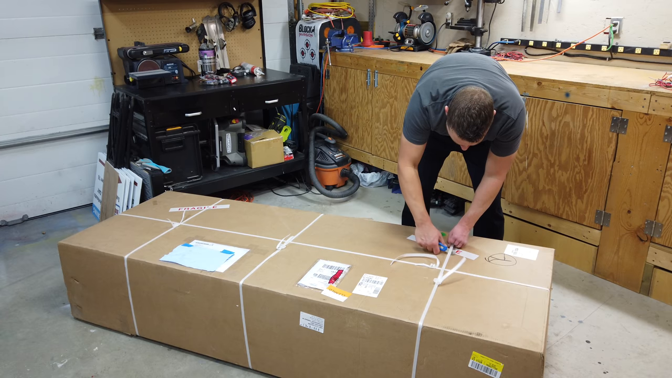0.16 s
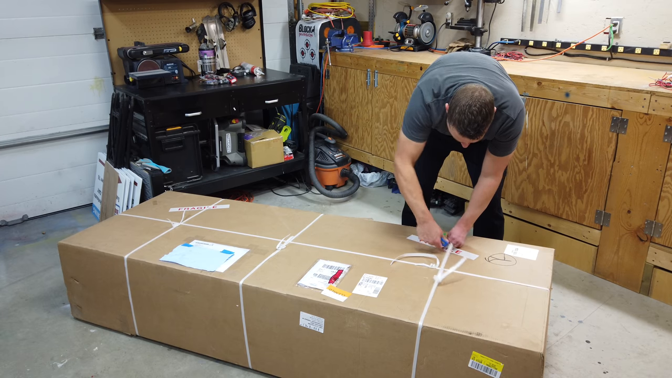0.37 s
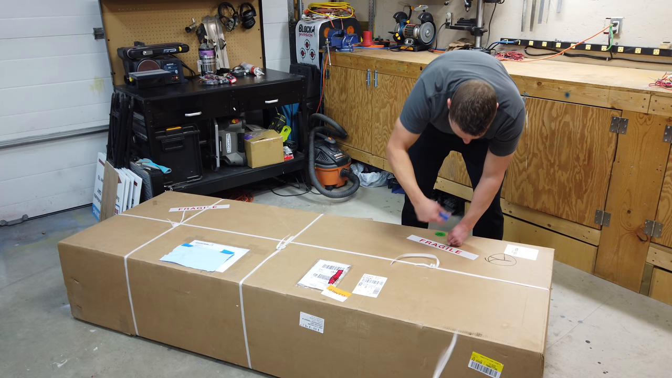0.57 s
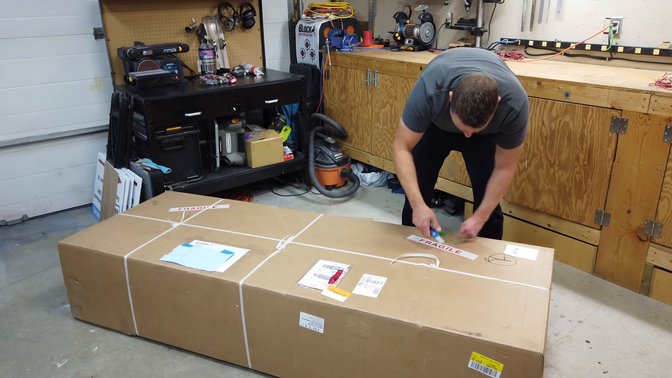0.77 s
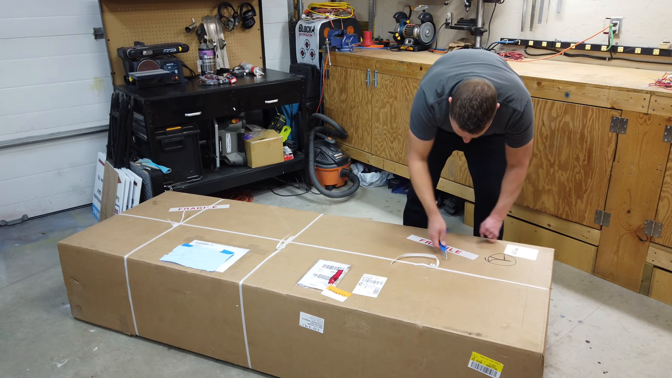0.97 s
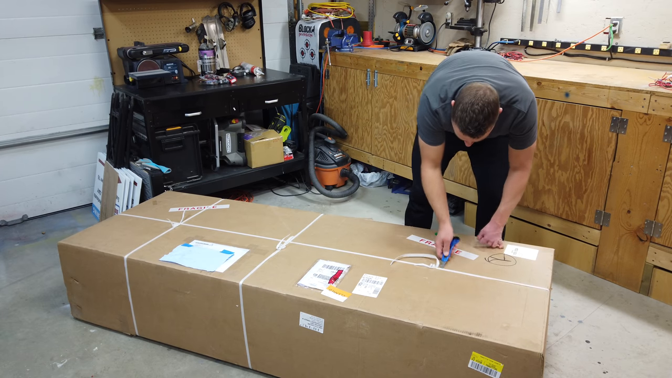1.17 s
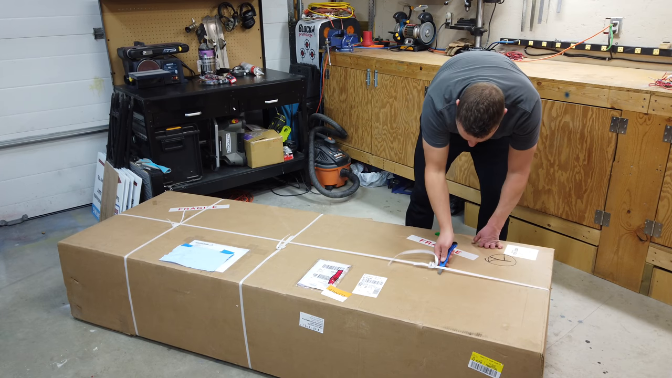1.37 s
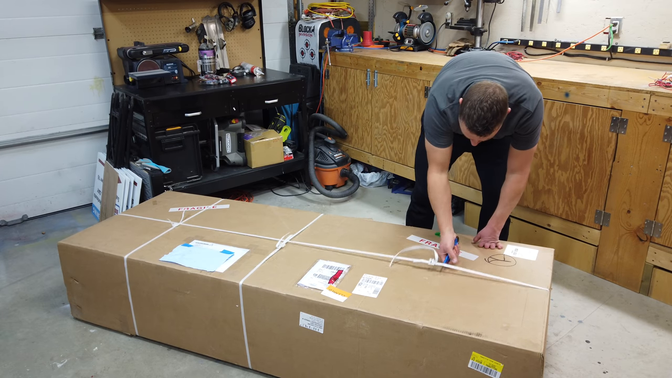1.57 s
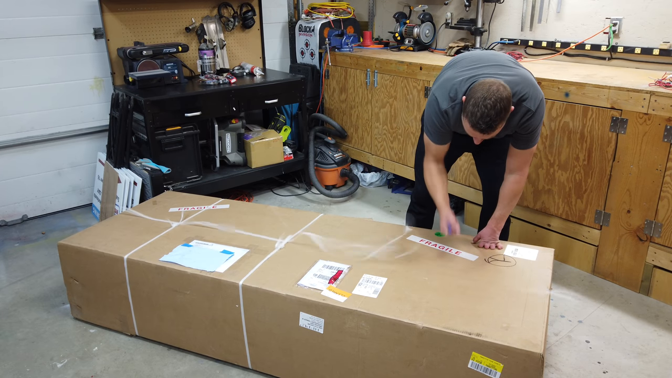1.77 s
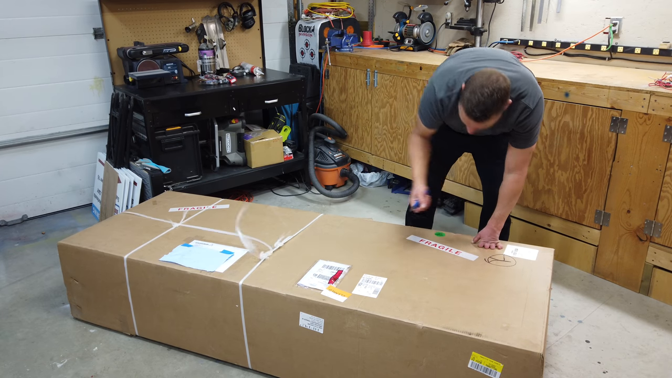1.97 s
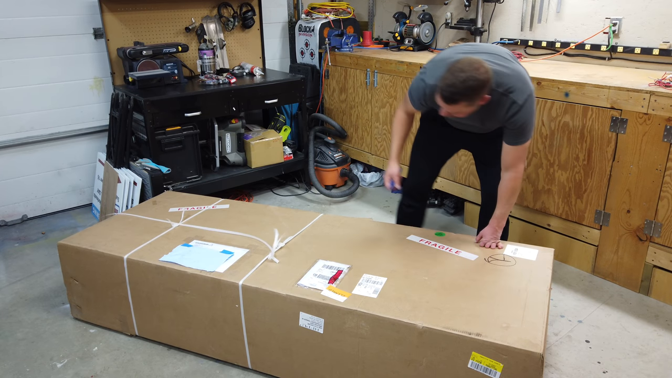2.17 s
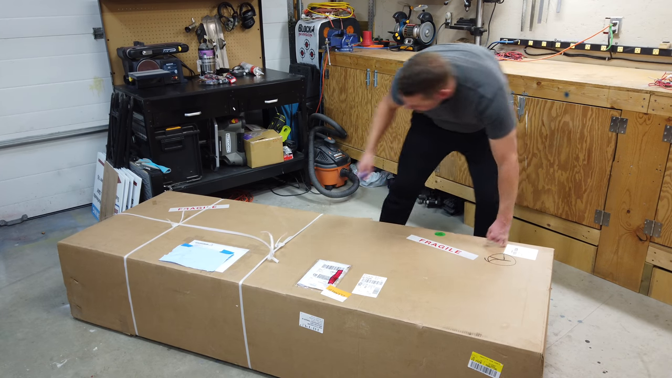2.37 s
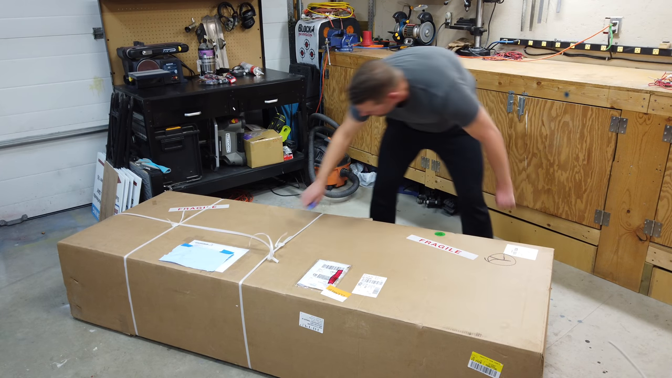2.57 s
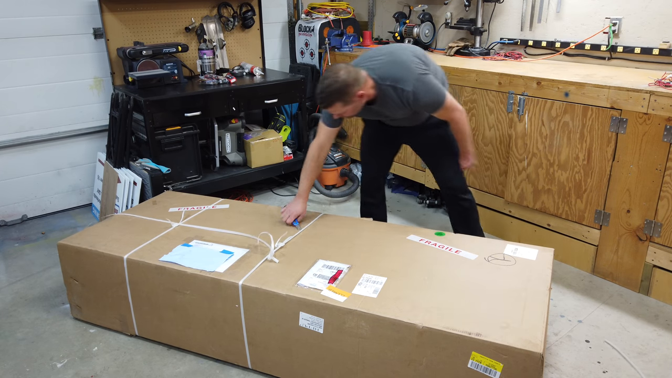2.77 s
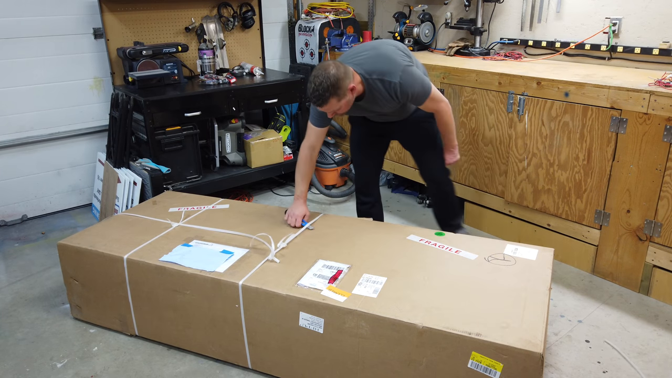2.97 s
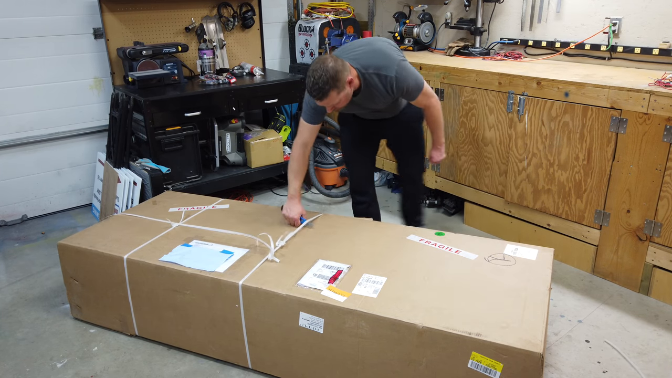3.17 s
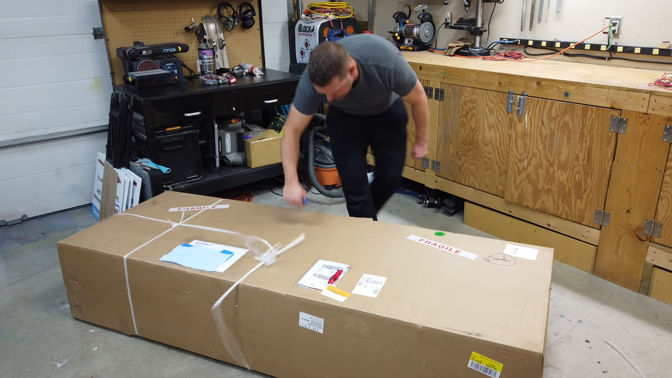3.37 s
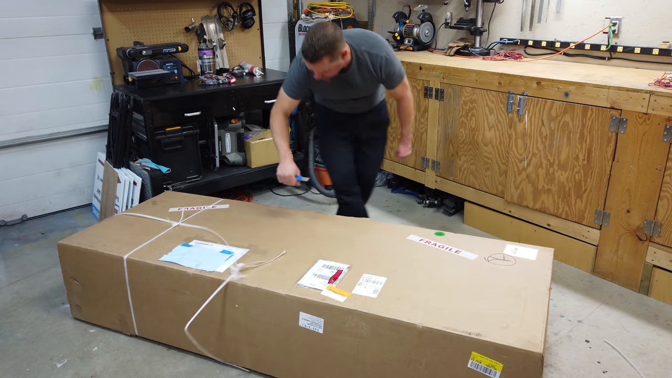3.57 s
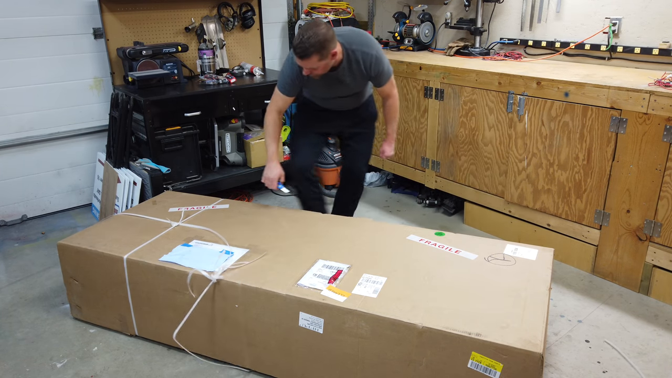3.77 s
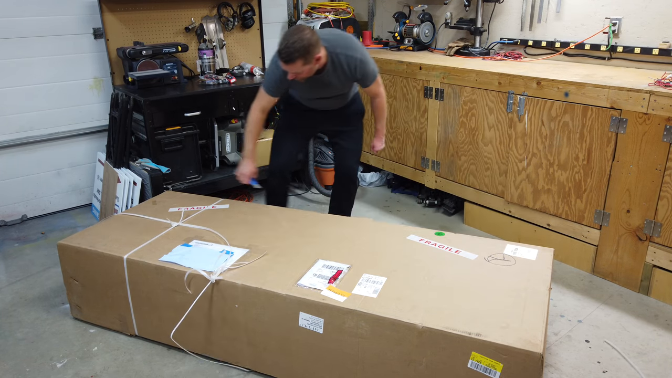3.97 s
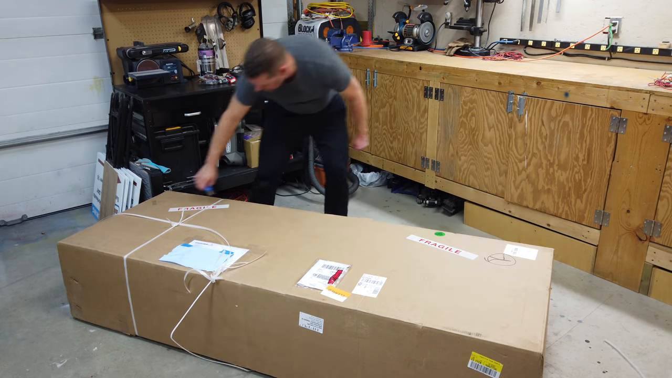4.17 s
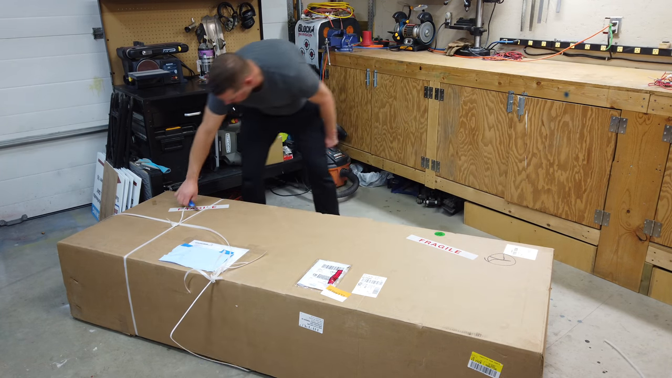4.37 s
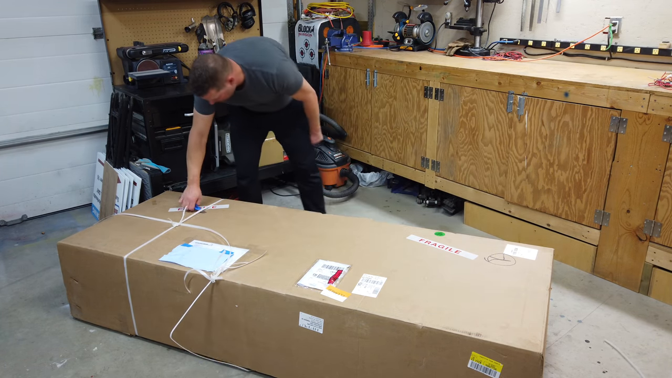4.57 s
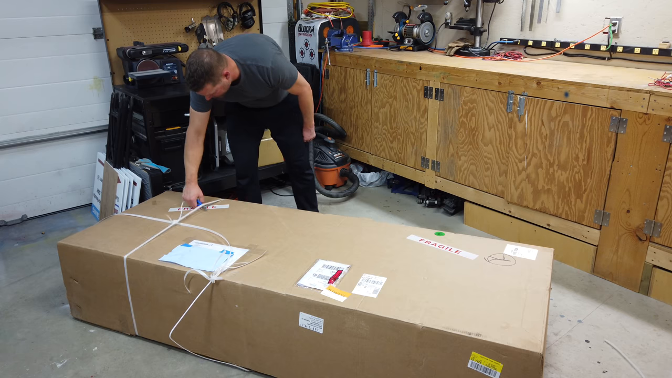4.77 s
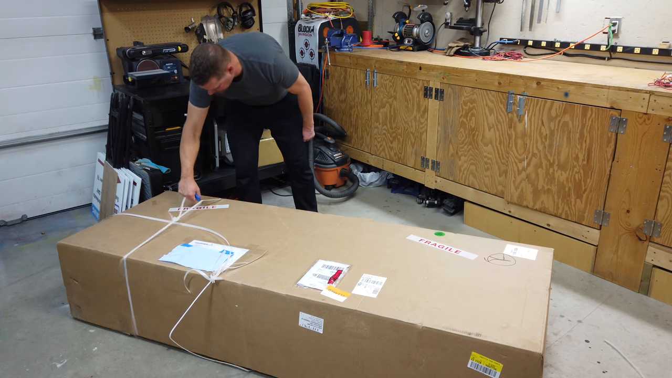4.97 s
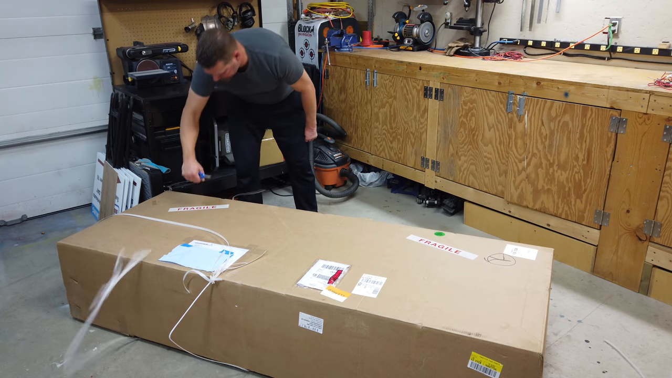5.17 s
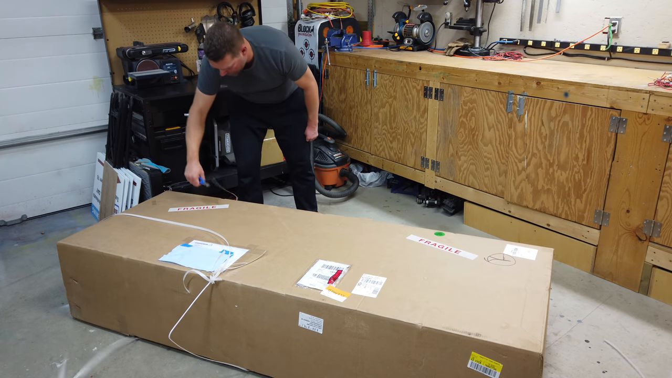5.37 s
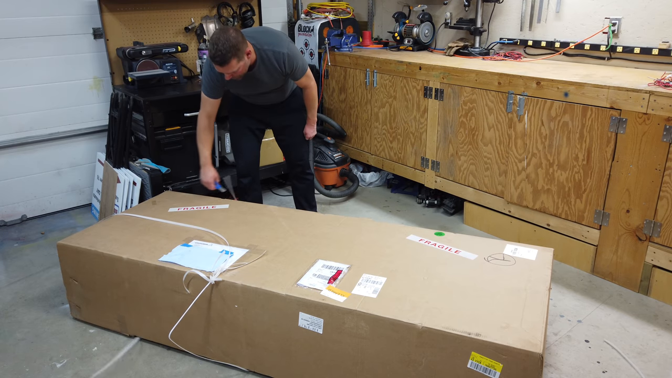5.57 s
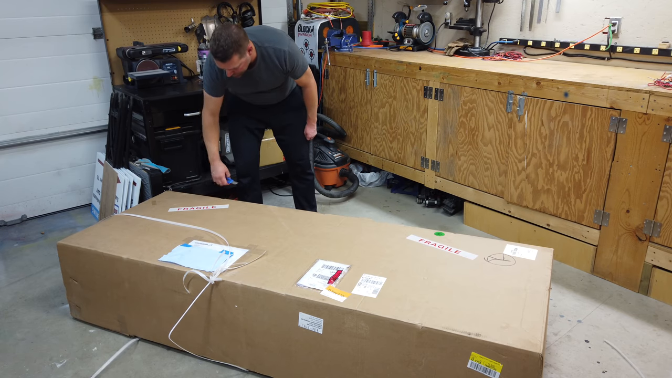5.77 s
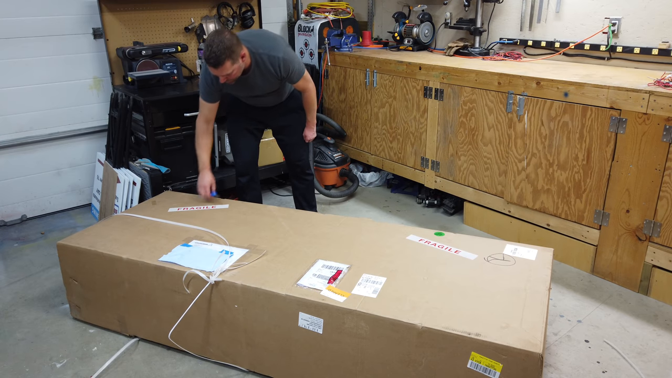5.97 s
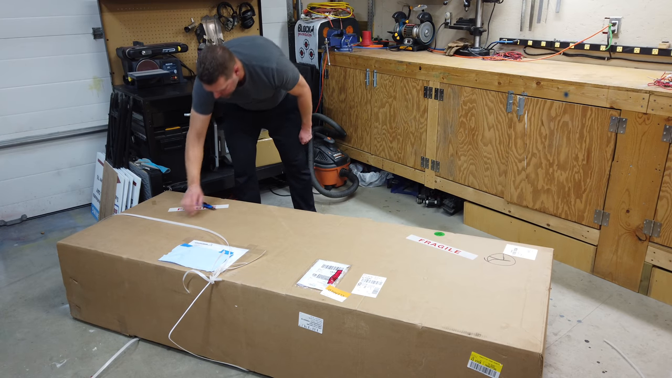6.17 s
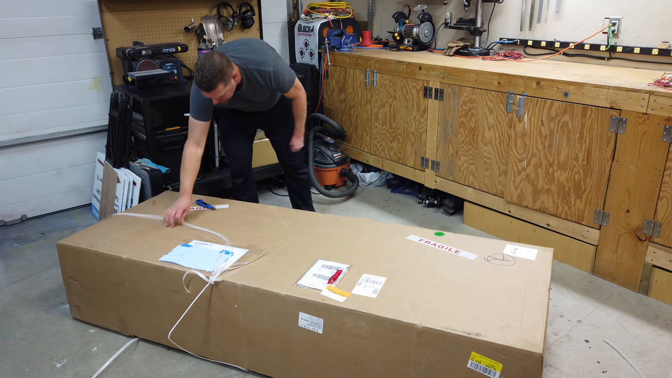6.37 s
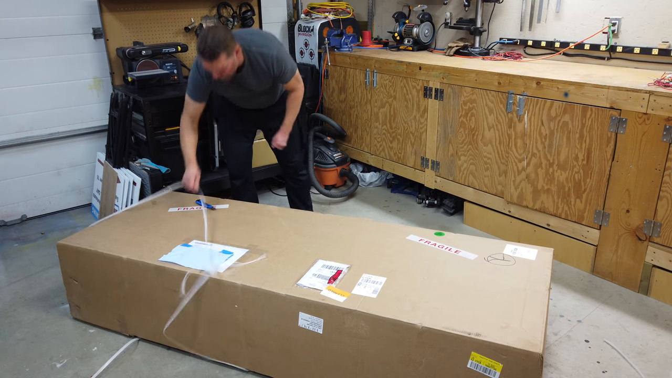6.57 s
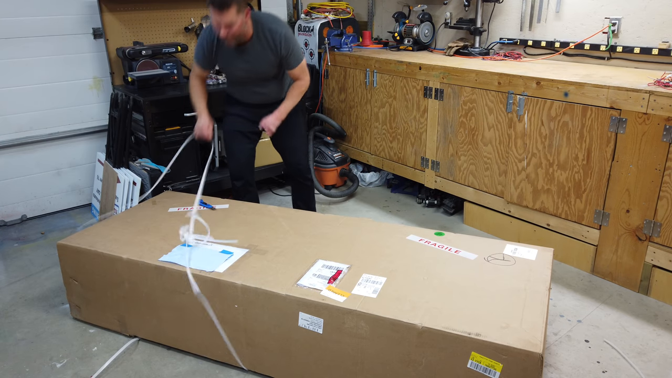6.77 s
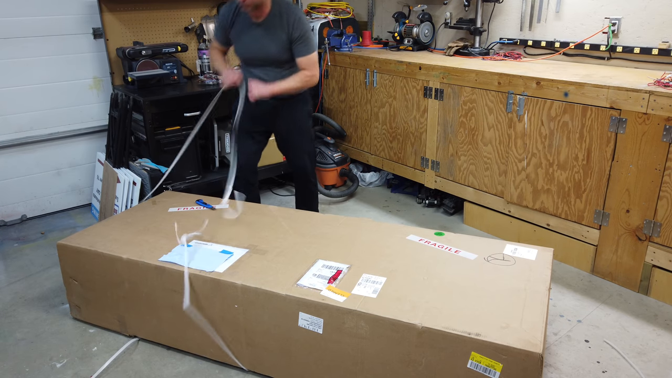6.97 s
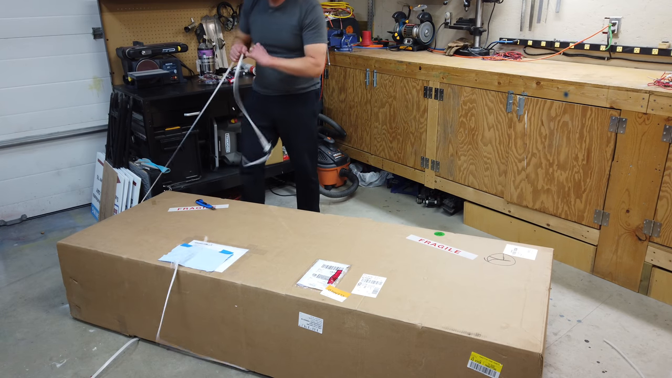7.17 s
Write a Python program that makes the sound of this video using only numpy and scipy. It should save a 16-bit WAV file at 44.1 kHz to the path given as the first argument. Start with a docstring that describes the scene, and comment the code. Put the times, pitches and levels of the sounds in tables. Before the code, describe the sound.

Tight packing straps let go one after another with dry, bright cracks and boxy slaps. Between them come quiet ticks, hissing ribbon rustle and a blade dragging over cardboard. Near the end, two dull knocks and deep bumps lead into dry, crackling straps being gathered. Everything is straight ahead in a hard garage, its echo under half a second, over faint hush and low air rumble; the treble is wider early, then narrow.

```python
"""Cutting straps off a big box

In a concrete garage, plastic straps round a large cardboard box are cut, straight ahead of the microphone.
Each contact is a short crack of plastic noise and a slap through the resonances of the hollow box.
Loose ends rustle and a knife slides over the cardboard: gritty friction noise through bands and resonances.
Steps and moving air rumble at the microphone over a steady hush; the garage rings for just under half a second."""
import sys
import numpy as np
from scipy import signal
from scipy.fft import rfft, irfft, next_fast_len
from scipy.io import wavfile
from scipy.ndimage import map_coordinates

SR = 44100
rng = np.random.default_rng(int(sys.argv[2]) if len(sys.argv) > 2 else 0)


def to_wav(sig):
    """Store sig (one row per channel, or 1-D mono) as 16-bit WAV at the path in sys.argv[1].

    Samples outside -1..1 are clipped; the rate is SR.
    """
    pcm = np.clip(np.atleast_2d(sig), -1, 1) * 32767
    pcm = np.round(pcm).astype(np.int16)
    wavfile.write(sys.argv[1], SR, pcm.T)  # frames by channels


N = 317961


def amp(db):
    """Gain of a dB value."""
    return 10 ** (np.asarray(db) / 20)


def unit(x):
    """x at rms 1."""
    return x / np.sqrt(np.mean(x ** 2) + 1e-20)


def along(points, hz):
    """Values between (Hz, value) points on a log frequency axis."""
    f, v = np.transpose(points)
    return np.interp(np.log(hz + 1), np.log(f + 1), v)


def filtered(x, response):
    """x times a response of frequency, zero-padded so that its end does not wrap round."""
    n = x.shape[-1]
    m = next_fast_len(n + 8192)
    return irfft(rfft(x, m) * response(np.fft.rfftfreq(m, 1 / SR)), m)[..., :n]


def peak(f, hz, width_hz):
    """One causal resonance with gain 1 at its centre."""
    return 1j * f * width_hz / (hz * hz - f * f + 1j * f * width_hz)


def modes(f, table):
    """A body as the sum of its resonances, with alternating signs."""
    return sum((-1) ** k * amp(db) * peak(f, hz, width) for k, (hz, width, db) in enumerate(table))


def causal(power):
    """The minimum-phase pulse with this power spectrum, its energy packed as early as it can be."""
    cep = irfft(np.log(power + 1e-12) / 2)
    half = len(cep) // 2
    # folding the cepstrum onto positive time makes the phase minimal
    cep = np.r_[cep[0], 2 * cep[1:half], cep[half], np.zeros(half - 1)]
    return irfft(np.exp(rfft(cep)))[:half]


def swells(rows):
    """One envelope per row: soft rise, hold, then a fade even in dB."""
    start, rise, hold, t60, db = np.transpose(rows)[:5, :, None]
    t = np.arange(N) / SR - start
    fade = np.clip(t - rise - hold, 0, None) / t60
    return np.clip(t / rise, 0, 1) ** 2 * amp(db - 60 * fade)


def grit(density, spread_db, uneven_db):
    """Friction: noise under uneven pressure plus sharp catches of unequal size, density of them a second."""
    draw = rng.random((2, N))
    catches = (draw[0] < density / SR) * amp(-spread_db * np.log(draw[1] + 0.22))
    # the pressure wanders smoothly between random values 1000 samples apart
    pressure = map_coordinates(rng.standard_normal(N // 1000 + 4), [np.arange(N) / 1000])
    return unit(rng.standard_normal(N) * (1 + 0.92 * catches) * amp(uneven_db * pressure))


# The steady hush of the place. Each row: frequency in Hz, relative spectral level in dB per Hz.
HUSH_SPECTRUM = [(35, -36.5), (60, 1.5), (185, 2), (334, -0.5), (1190, -3.5), (6600, -12.5), (8540, -10.5),
                 (14300, -7.5), (15400, -18.5), (16500, -32)]


def hush():
    """Steady noise with the colour of the place, drawn apart for mid and side."""
    noise = rng.standard_normal((2, N))
    return amp(-62.5) * unit(filtered(noise, lambda f: amp(along(HUSH_SPECTRUM, f))))


# Lumps of moving air at the microphone.
# Each row: start in seconds, rise in seconds, hold in seconds, fade t60 in seconds, level in dB.
AIR_LUMPS = [(0.1, .1, .3, .5, -74.5), (0.54, .04, .01, 0.3, -41), (0.66, .03, .05, 1.2, -60.5),
             (1.856, .035, .01, .9, -48.5), (2.5, .05, .35, 0.37, -44), (2.9, .05, 0.32, .3, -59),
             (3.42, .035, .01, .45, -45.5), (3.58, .15, .11, 0.33, -54), (3.9, .03, .05, .9, -61.5),
             (4.085, .03, .01, 0.66, -58.5), (4.25, .13, .03, 1.2, -60), (4.6, .1, .35, .5, -71.5),
             (5.1, .01, .14, .18, -49), (5.8, .04, .14, .2, -72), (6.17, .04, .01, 0.42, -59),
             (6.36, .06, .02, .3, -39.5), (6.6, .1, .5, 0.54, -62.5)]
# Steps and dull bumps through floor and box, in the same columns:
# start in seconds, rise in seconds, hold in seconds, fade t60 in seconds, level in dB.
BUMPS = [(0.1, 0.021, .01, 0.92, -66.5), (0.335, 0.021, .01, 0.53, -53),
         (0.538, 0.0042, 0.045, 0.23, -38.5), (1.22, 0.1, .01, 0.38, -72), (1.5, 0.091, 0.017, 0.9, -70.5),
         (1.856, 0.038, 0.0094, 0.77, -39.5), (2.33, 0.048, 0.012, .25, -74.5), (2.57, 0.078, .1, .5, -63),
         (2.8, 0.058, 0.011, .95, -60), (3.42, .005, .01, 0.41, -45), (3.87, 0.092, 0.064, .2, -71),
         (4.095, 0.017, 0.008, .9, -73), (4.5, 0.045, .45, .5, -74.5), (5.1, 0.0044, 0.032, 0.32, -36.5),
         (5.65, 0.035, 0.012, .3, -71.5), (5.81, .03, 0.075, 0.7, -71.5), (6.163, 0.036, 0.011, .3, -28),
         (6.37, 0.043, 0.016, 0.26, -35), (6.5, .02, 0.034, 0.94, -56.5), (7.08, 0.05, 0.046, .5, -48)]
STILL_AIR_DB = -76.5  # the air is never quite at rest


def rumble():
    """Deep lumps of air pressure near 25 Hz, and dull bumps near 125 Hz through floor and box."""
    air = filtered(rng.standard_normal(N), lambda f: peak(f, 27, 28) * peak(f, 24, 60))
    bump = filtered(rng.standard_normal(N), lambda f: peak(f, 125, 91) ** 2)
    air_level = swells(AIR_LUMPS).sum(axis=0) + amp(STILL_AIR_DB)
    return air_level * unit(air) + swells(BUMPS).sum(axis=0) * unit(bump)


# How long the concrete garage rings. Each row: frequency in Hz, t60 in seconds.
GARAGE_T60 = [(80, 0.3), (250, 0.4), (1000, 0.44), (4000, 0.45), (10000, 0.33), (16000, 0.27)]


def garage(x):
    """Mid and side of the diffuse answer; each frequency dies at its own speed."""
    noise = rng.standard_normal((2, SR * 3 // 4))
    hz, t, z = signal.stft(noise, SR, nperseg=256)
    decay = amp(-60 * t / along(GARAGE_T60, hz)[:, None])
    tail = signal.istft(z * decay, SR, nperseg=256)[1]
    tail = tail * (1 - np.exp(-np.arange(tail.shape[1]) / SR / 0.00071))  # reflections build up
    return signal.fftconvolve(x[None], tail / np.linalg.norm(tail[0]), axes=1)


# Wall and air modes of the hollow box. Each row: frequency in Hz, width in Hz, level in dB.
BOX_MODES = [(100, 100, -6.5), (132, 81, -8.5), (205, 83, -8.5), (352, 59, -3), (441, 90, -3.5),
             (648.5, 146, 0.5), (760, 280, -1), (1041, 304, -2.5), (1224, 190, -0.5), (1500, 633, -4),
             (2094, 1350, -8)]


def box(f):
    """The hollow box: the sum of its wall and air modes."""
    return modes(f, BOX_MODES)


# Loose strap dragging and whipping. Each row: start in seconds, rise in seconds, hold in seconds,
# fade t60 in seconds, hiss level in dB, pitch that picks the hiss bands in Hz,
# clatter on the box over hiss in dB.
RUSTLES = [(0.0, 0.0044, 0.084, .3, -74.5, 5200, 11.5), (0.264, .035, .01, 0.2, -63.5, 6370, 0),
           (0.442, .008, 0.0087, 0.22, -74, 4230, 13), (0.58, 0.03, 0.0087, 0.315, -44, 4820, 12.5),
           (0.847, .012, 0.0077, 0.46, -42.5, 5870, -7.5), (0.921, 0.026, .03, 0.36, -55.5, 6460, -25.5),
           (0.956, 0.044, 0.0093, 0.54, -65, 4320, -22), (1.924, 0.021, 0.015, 0.81, -42.5, 4600, 3),
           (2.0, 0.049, 0.037, 0.19, -48, 5740, -4.5), (2.1, 0.0069, 0.012, 0.33, -57, 5000, 13),
           (3.488, 0.033, 0.011, 0.51, -46, 5730, 8), (3.629, .04, 0.018, 0.71, -60.5, 4700, -1),
           (3.717, 0.06, 0.016, 0.71, -64, 5740, 4.5), (4.086, 0.0072, .01, 0.28, -63, 7830, 9.5),
           (4.195, .006, .01, 0.42, -55.5, 5440, -14.5), (4.32, .03, 0.092, 0.28, -77.5, 5970, -16),
           (4.974, 0.0093, 0.0046, 0.061, -43.5, 4600, 3), (5.061, 0.0039, 0.0083, 0.31, -46.5, 6140, 12),
           (5.295, 0.017, 0.09, .2, -71, 4700, -4.5), (5.552, .045, 0.14, 0.28, -59.5, 6300, -4.5),
           (5.805, 0.0053, 0.0088, 0.47, -51, 5140, -17.5), (6.399, 0.11, .01, 0.42, -55, 7900, -7),
           (6.645, 0.1, 0.0076, 0.85, -52.5, 5060, -4.5), (6.866, 0.035, 0.043, 0.2, -56, 7900, 9.5),
           (6.912, 0.083, .01, 0.68, -49.5, 5700, -12), (7.105, 0.0072, 0.0033, 0.38, -35, 8000, -4)]
RING_WIDTH = 0.13  # width of a ribbon band, as a share of its frequency
WIDE_HISS = 0.3    # gain of the broad hiss beside each band


def strap():
    """Stiff ribbon dragging: gritty hiss weighted to the nearest ribbon bands, and a clatter on the box."""
    centres_hz = np.array([4280, 5120, 6400, 8430])
    drag = grit(density=500, spread_db=2.0, uneven_db=2.24)

    def ribbon_band(hz):
        """One ribbon resonance over broad hiss."""
        return unit(filtered(drag, lambda f: peak(f, hz, RING_WIDTH * hz) + WIDE_HISS * peak(f, 8000, 21000)))

    bands = np.array([ribbon_band(hz) for hz in centres_hz])
    clatter = unit(filtered(drag, lambda f: box(f) * peak(f, 1500, 3000) ** 2))
    out = np.zeros(N)
    for whip, (*_, hz, clatter_db) in zip(swells(RUSTLES), RUSTLES):
        shares = np.exp(-(np.log(hz / centres_hz) / 0.049) ** 2) + 0.032
        hiss = shares @ bands / np.linalg.norm(shares)
        out += whip * (hiss + amp(clatter_db) * clatter)
    return out


# Hiss of the scraped paper liner. Each row: frequency in Hz, relative level in dB.
PAPER_HISS = [(300, -30.5), (1500, -9), (3300, 3), (4800, 1), (6000, -1.5), (7200, -3.5), (8400, 0),
              (10500, -3.5), (15000, -4.5)]
# Resonances of blade and handle. Each row: frequency in Hz, width in Hz, level in dB.
KNIFE_MODES = [(660, 55, 1.5), (1240, 190, 1), (1640, 34, 1.5), (2240, 30, -8.5), (3180, 120, -13),
               (4000, 40, -4.5), (5800, 99, -12.5), (6120, 37, -11), (8600, 260, -9)]
# Knife strokes on the cardboard. Each row: start in seconds, rise in seconds, hold in seconds,
# fade t60 in seconds, stroke level in dB, hiss over body in dB, lid hum over stroke level in dB,
# lid hum in Hz (it steers a blend of two tones), freedom of the knife to ring in dB (0 is about fully free).
STROKES = [(0.01, 0.024, 0.027, 0.33, -61.5, -7.5, -2.5, 385, -32),
           (0.101, 0.038, 0.034, 0.26, -69, -20, 12.5, 410, -16.5),
           (0.33, 0.012, 0.047, 0.49, -72.5, -13.5, 19, 403, -25),
           (1.213, 0.012, 0.24, 0.32, -41, 0.5, -8.5, 365, 0),
           (1.57, 0.016, 0.014, 0.3, -57, 2, 3.5, 360, 4.5),
           (1.79, 0.032, 0.014, .1, -53.5, -2, -9.5, 380, -16),
           (2.579, 0.01, 0.043, 0.5, -57.5, -11, -1.5, 422, -13.5),
           (2.642, 0.024, 0.027, 0.58, -72.5, 3.5, 15, 425, -14),
           (2.816, 0.013, .03, 0.42, -55.5, -4, 8, 399, -22),
           (2.821, .07, .07, 0.74, -52.5, -5.5, -6.5, 392, -19),
           (2.975, 0.087, 0.027, 0.67, -60.5, -3.5, -7.5, 378, -14),
           (4.517, 0.026, 0.14, 0.88, -48, 3.5, -2.5, 412, -17),
           (4.544, 0.12, 0.18, 2.1, -49.5, 0.5, -21, 406, -7)]


def knife():
    """The drag excites box and knife, hisses on the liner and hums the lid; the hum rises near an edge."""
    drag = grit(density=570, spread_db=3.5, uneven_db=0.7)
    body = unit(filtered(drag, lambda f: box(f) * peak(f, 1100, 1500)))
    hiss = unit(filtered(drag, lambda f: amp(along(PAPER_HISS, f))))
    ring = unit(filtered(drag, lambda f: modes(f, KNIFE_MODES)))
    low_hum = unit(filtered(drag, lambda f: peak(f, 355, 24)))
    high_hum = unit(filtered(drag, lambda f: peak(f, 412, 24)))
    out = np.zeros(N)
    for stroke, (*_, hiss_db, hum_db, hum_hz, free_db) in zip(swells(STROKES), STROKES):
        high_share = np.clip((hum_hz - 370) / 30, 0, 1)
        hum = np.sqrt(1 - high_share) * low_hum + np.sqrt(high_share) * high_hum
        free = amp(free_db)
        # the freer the knife rings, the less it rubs
        rub_gain = np.sqrt(1 - np.clip(0.94 * free, 0, 1))
        rubbed = rub_gain * (body + amp(hiss_db) * hiss) + 0.41 * free * ring
        out += stroke * (rubbed + amp(hum_db) * hum)
    return out


# Strap cracks, slaps and ticks on the box. Each row: start in seconds, crack peak in dB, crack in Hz,
# sharp edge over crack in dB, box knock over crack in dB, knock in Hz, garage answer in dB.
SNAPS = [(0.3456, -53, 2296, -17, 3, 415, 6), (0.4514, -41, 2330, -20, -11, 420, 3),
         (0.5184, -39.5, 7500, -8, -5, 510, 10), (0.5365, -7.5, 4330, -15, -2, 1810, 1.5),
         (0.5403, 0, 7090, -3, -5, 496, -5), (0.5462, -8.5, 3987, -10, 2.5, 998, -1.5),
         (0.858, -32.5, 6350, -5, -13.5, 1170, -1.5), (0.9685, -35, 6000, -13.5, -31, 1490, 10),
         (1.2291, -35, 8600, -11, -5, 390, 0.5), (1.5784, -44, 5100, 5.5, 2, 385, 3),
         (1.8535, -3.5, 4470, -36, -7, 1050, 0), (1.8599, -7.5, 5100, -13, 6.5, 980, 0.5),
         (1.878, -3, 8300, 4.5, -9, 1210, -6), (2.1113, -28, 2900, -9, -8.5, 384, 4.5),
         (2.3292, -52.5, 2040, 2, -13, 1260, 10), (2.3499, -43.5, 1980, -6, 2, 1240, 7),
         (2.5186, -48.5, 3170, -15, -12.5, 990, 11.5), (2.578, -48, 1980, -16, 7.5, 1480, 1.5),
         (2.8185, -54, 2280, -1, 12.5, 418, 10.5), (3.03, -41.5, 3020, 1, -11, 813, 8),
         (3.288, -60.5, 2000, -9, 8, 853, 9), (3.4167, -13.5, 4670, 8, 0.5, 580, -1),
         (3.4248, -8.5, 1940, -12, 3.5, 620, 0), (3.4301, -17.5, 4020, -10, 10, 367, -2),
         (3.8501, -58.5, 2020, -1.5, 15, 1175, 8), (3.8627, -44, 2040, 1, 1.5, 1096, 12),
         (4.0973, -41, 8290, -7, -6, 1440, 5.5), (4.2058, -36, 5350, -6.5, -14.5, 714, 2.5),
         (4.36, -48.5, 6590, -5, -14, 1390, -3), (4.5255, -42.5, 3260, 0, -1, 410, 3),
         (4.9808, -40, 4430, -8, -8, 1900, 3.5), (4.9841, -30.5, 2370, -20, -13, 1900, 8),
         (5.064, -28, 8260, -19, -9, 766, 12), (5.0987, -8.5, 4930, -2.5, 3.5, 1010, 1),
         (5.1074, -15, 7950, -6, 2.5, 680, 2.5), (5.3598, -39, 4340, -1, -13, 740, -3.5),
         (5.3947, -40.5, 4000, 6, -25.5, 760, 0.5), (5.518, -59, 1400, -8, 5.5, 1300, -10),
         (5.5514, -34, 8300, -2, -27, 1260, 0), (5.5871, -26.5, 8200, -1, -17, 1073, 3),
         (5.6699, -34.5, 5300, 2, -27.5, 1514, 7), (5.7723, -39, 7940, -7, -17.5, 1375, 8),
         (5.8121, -29, 4850, -11, -32.5, 1480, 5), (6.1623, -16, 3000, -16.5, 4, 464, 7),
         (6.194, -11.5, 3400, -20, 3.5, 481, 1.5), (6.4035, -50, 2080, -1, 14, 301, 3),
         (6.433, -49.5, 2000, -17, 10, 200.3, 0.5), (6.6636, -53.5, 2020, 4, 2, 1290, 17),
         (6.7644, -37.5, 4530, 3, -2, 1450, 6.5), (6.8836, -35.5, 2580, 6, -12, 1500, 8),
         (6.8952, -38.5, 2570, 5, -3.5, 1290, 16.5), (6.9087, -33, 9250, 14, -28, 1280, 4.5),
         (6.9733, -26, 8300, 0, -14.5, 1120, 3.5), (7.111, -25.5, 8300, -12, -13.5, 1040, 17.5),
         (7.1151, -19.5, 8100, 8, -9, 1030, -19), (7.1238, -16, 8250, -10, -21, 1120, -2)]
CRACK_T60_S, KNOCK_T60_S, RISE_S = 0.0084, 0.011, 0.00013
THUD_DB = -9.5          # deep thud of the box, relative to its knock
CRISP_DB_PER_DB = 0.26  # a harder contact adds more wide-band crack to the ribbon's own ring


def snap_colours(db, crack_hz, knock_hz):
    """Responses of the parts of a contact: plastic crack, sharp edge, box knock and deep box thud."""
    crisp = amp(CRISP_DB_PER_DB * db + 2.0)
    return [lambda f: peak(f, crack_hz, RING_WIDTH * crack_hz) + crisp * peak(f, 4800, 6000),
            lambda f: peak(f, 14000, 16000) ** 2,
            lambda f: box(f) * peak(f, knock_hz, 0.83 * knock_hz),
            lambda f: box(f) * peak(f, 140, 230)]


def snaps():
    """Each contact is a crack of plastic and a longer slap that rings the box; then the garage answers."""
    out = np.zeros((2, N + 2 * SR))
    t = np.arange(SR // 8) / SR
    grid = np.fft.rfftfreq(8192, 1 / SR)
    lives = [CRACK_T60_S, CRACK_T60_S, KNOCK_T60_S, KNOCK_T60_S]
    for start, db, crack_hz, edge_db, knock_db, knock_hz, wet_db in SNAPS:
        colours = snap_colours(db, crack_hz, knock_hz)
        levels = amp([db, db + edge_db, db + knock_db, db + knock_db + THUD_DB])
        hit, power = np.zeros(len(t)), np.zeros(len(grid))
        for level, life, colour in zip(levels, lives, colours):
            burst = rng.standard_normal(len(t)) * amp(-60 * t / life) * (1 - np.exp(-t / RISE_S))
            part = filtered(burst, colour)
            part *= level / np.abs(part).max()
            hit += part
            # summed over all directions the contact has an even spectrum
            even = np.abs(colour(grid)) ** 2
            power += even / even.mean() * np.sum(part ** 2)
        sound = amp(wet_db) * garage(causal(power))
        sound[0, :len(t)] += hit  # the direct sound comes from straight ahead
        out[:, round(start * SR):][:, :sound.shape[1]] += sound
    return out[:, :N]


# Stereo width of the treble, wide at first and then nearly closed.
# Each row: time in seconds, gain of the side signal in dB.
TREBLE_WIDTH = [(0, -5), (3.5, -1.5), (3.56, -74.5), (7.21, -45)]


def scene():
    """All sources lie straight ahead; only the treble above 3 kHz and the deep part of the hush spread wide."""
    rubbing = knife() + strap()
    mid, side = snaps() + amp(-9.5) * garage(rubbing)[:, :N]
    steady = hush()
    mid = mid + rubbing + rumble() + steady[0]
    times, width_db = np.transpose(TREBLE_WIDTH)
    width = amp(np.interp(np.arange(N) / SR, times, width_db))
    # above 3 kHz the treble spreads wide; below 900 Hz the hush alone
    treble = filtered(side + steady[1], lambda f: 1 / (1 + (3000 / (f + 1)) ** 16) / (1 + f / 12000))
    low_hush = filtered(steady[1], lambda f: 1 / (1 + (f / 900) ** 6))
    side = width * treble + amp(-17.5) * low_hush
    return np.array([mid + side, mid - side])


# Colour of the microphone. Each row: frequency in Hz, gain in dB.
MIC_COLOUR = [(2000, -5.5), (3000, -2.5), (5000, -4), (8300, -3), (10500, -9.5), (13000, -10),
              (15500, -16.5)]
TOP_HZ = 16100  # upper band limit


def record(dry):
    """Microphone colour, then a steep band limit."""
    return filtered(dry, lambda f: amp(along(MIC_COLOUR, f)) / (1 + (f / TOP_HZ) ** 80))


dry = scene()
out = record(dry)
to_wav(out)
```